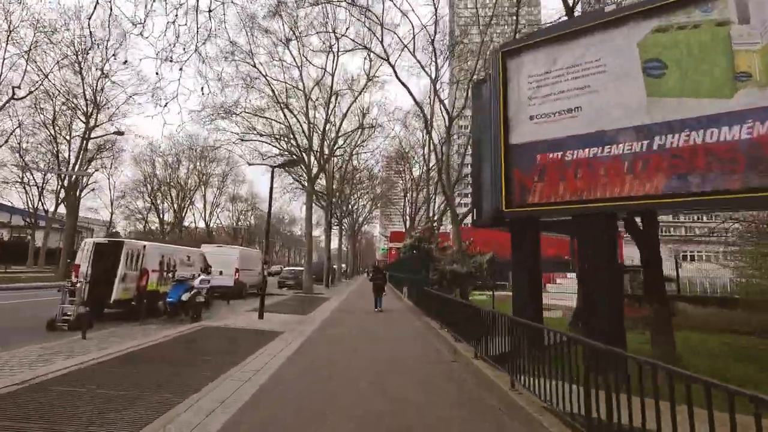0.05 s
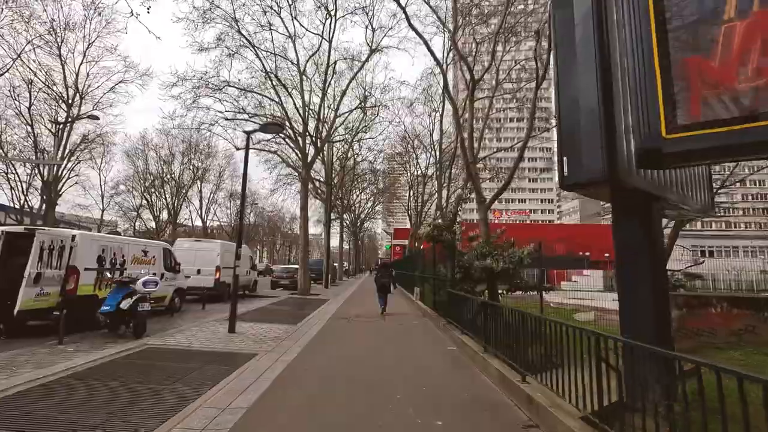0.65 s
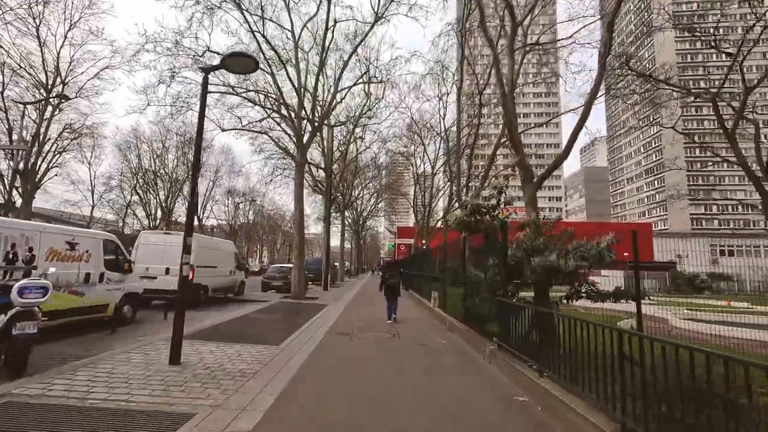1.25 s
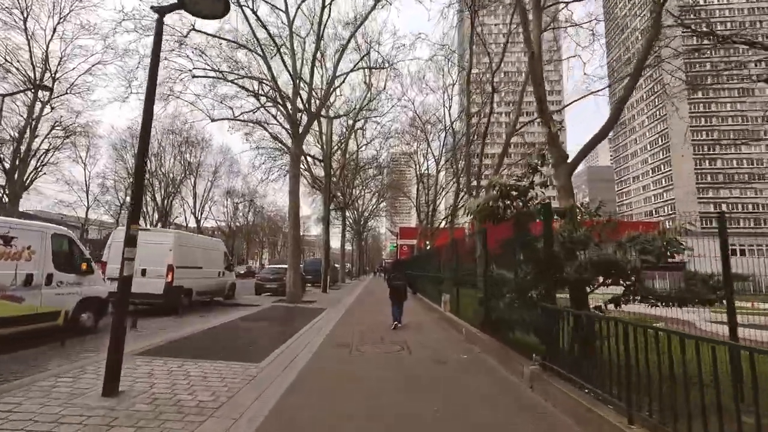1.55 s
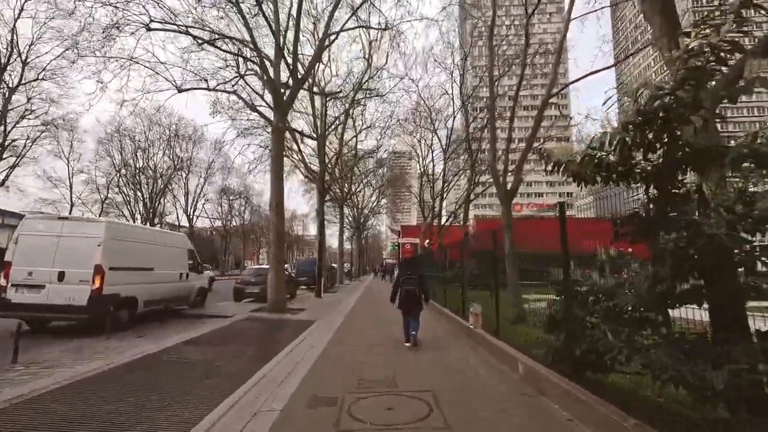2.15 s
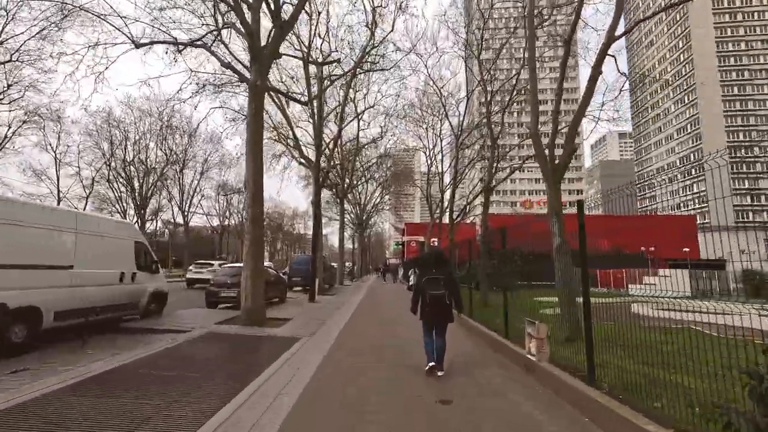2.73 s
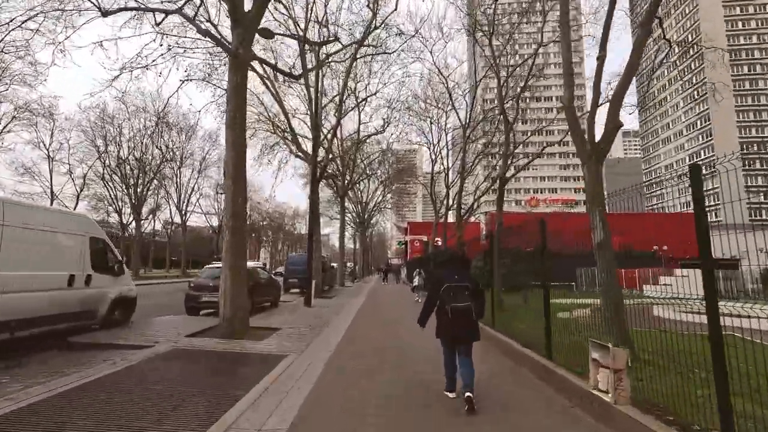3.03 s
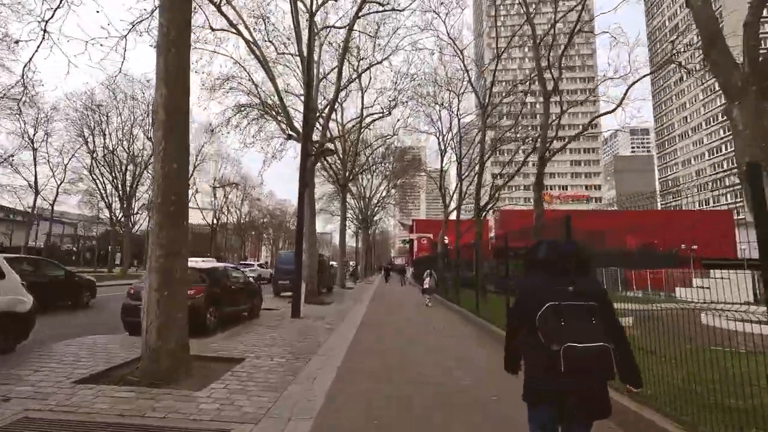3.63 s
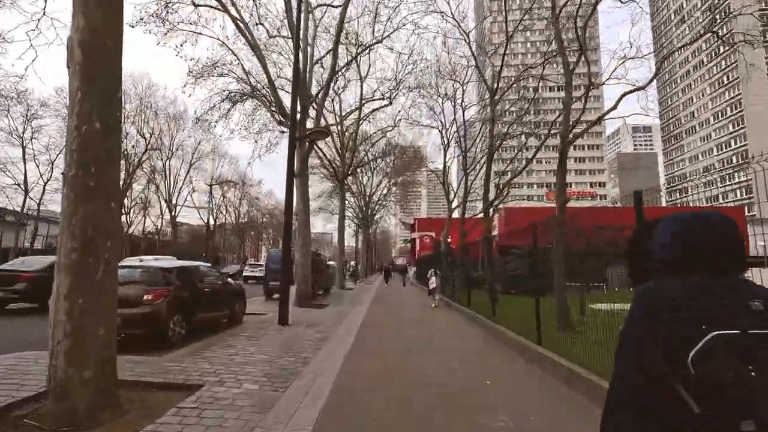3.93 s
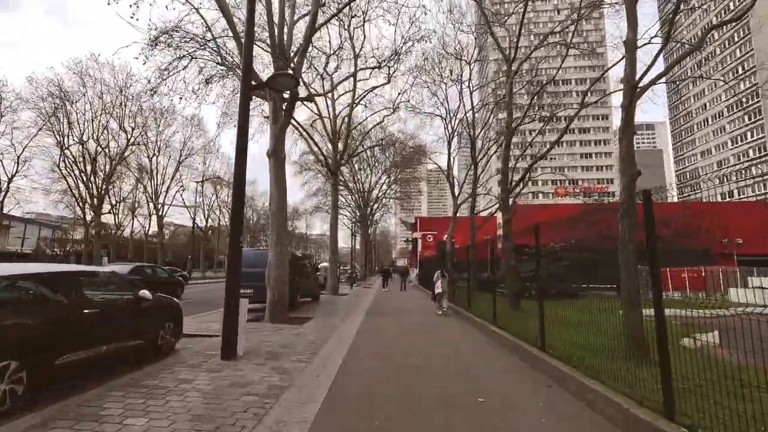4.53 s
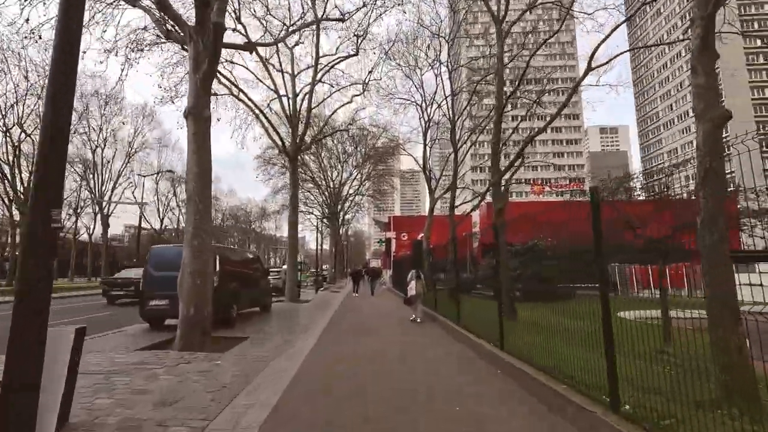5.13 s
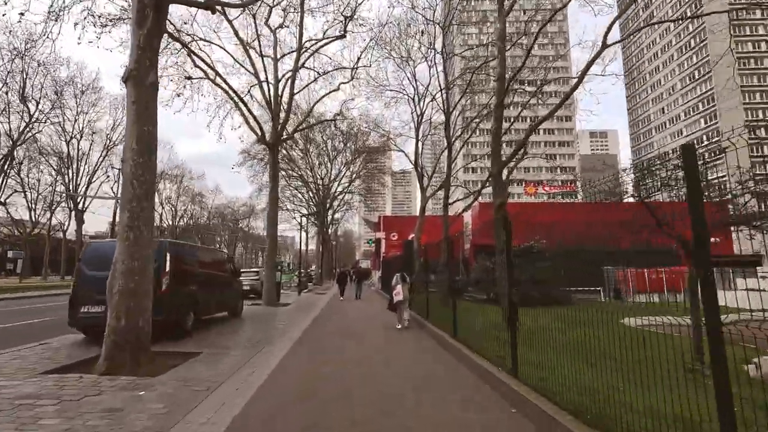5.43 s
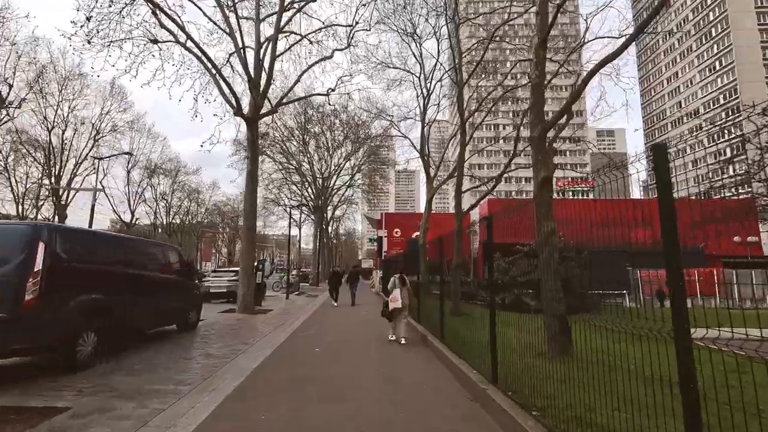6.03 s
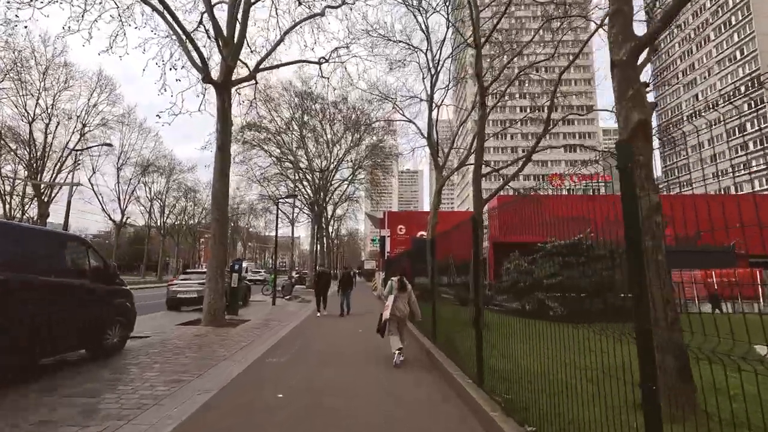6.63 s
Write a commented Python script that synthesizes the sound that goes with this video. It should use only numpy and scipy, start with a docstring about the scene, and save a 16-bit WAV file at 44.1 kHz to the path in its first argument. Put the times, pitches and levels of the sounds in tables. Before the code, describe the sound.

Skate wheels rumble and crackle over gritty asphalt, with wind buffeting the microphone and cars swishing past on a busy street.

```python
"""Inline skates rolling on an asphalt pavement beside a busy street, from a microphone on the skater.
Close up, the stony surface drums the wheels into a rumble; they crackle over sand, scuff on grit and
tick on a stone, while the air of the ride buffets the muffled mono microphone. Off to the side, car
tyres swish past in waves and an engine drones in swells. A thin fuzzy whistle hangs over the traffic
and fades; distant traffic lies behind it all."""
import sys
import numpy as np
from scipy import signal
from scipy.fft import rfft, irfft
from scipy.io import wavfile
from scipy.ndimage import uniform_filter1d

SR = 44100
rng = np.random.default_rng(int(sys.argv[2]) if len(sys.argv) > 2 else 0)


def store_wav(level_fs):
    """Save 16-bit WAV to argv[1]."""
    pcm = np.round(np.clip(np.atleast_2d(level_fs), -1, 1) * 32767)
    wavfile.write(sys.argv[1], SR, pcm.T.astype(np.int16))


N = 303408
T = np.arange(N) / SR

# how hard the wheels bear on the asphalt: t/s, relative level/dB
WHEEL_LOAD = [(0, -30.5), (1.35, -33), (1.85, -30.5), (2.35, -33.5), (2.9, -37.5), (3.25, -30.5),
              (3.55, -33.5), (3.85, -30.5), (4.1, -36), (5.5, -33.5), (6.5, -36.5), (6.88, -34.5)]
# spectra of wheel rumble, crushed sand and dust: f/Hz, relative level/dB
WHEEL_SPECTRUM = [(60, -22), (130, -6), (200, 0.5), (270, -4), (350, -4), (450, -8), (650, -25.5),
                  (1000, -12.5), (2000, -24), (5000, -81.5)]
SAND_SPECTRUM = [(1500, -4), (3000, 7), (3900, 7), (4900, -0.5), (5500, -6), (6200, -20.5), (7000, -23.5),
                 (8000, -39.5), (11500, -37.5), (12800, -49), (16000, -78)]
DUST_SPECTRUM = [(5000, -20), (8000, -5.5), (10000, 1), (11000, 5.5), (12000, -5.5), (13000, -16.5),
                 (16000, -57)]
# wheels droning on rough spots, scuffing, faintly squeaking: t/s, half-length/s, level/dB, f/Hz, width/Hz
ROUGH_SPOTS = [(.21, 0.11, -30, 234, 140), (.45, 0.1, -32.5, 377, 240), (1.65, 0.89, -36, 440, 260),
               (2.11, 0.046, -29, 340, 240), (3.14, 0.078, -31.5, 736, 320), (3.23, 0.076, -32.5, 310, 140),
               (4.88, .09, -30, 350, 150)]
WHEEL_SCUFFS = [(.062, .03, -54, 4800, 1600), (.108, .025, -44, 3600, 2190), (.2, .11, -55, 4570, 3200),
                (.49, 0.14, -33, 1300, 800), (1.555, .036, -52, 4470, 2200), (2.76, 0.093, -36, 1640, 900),
                (3.16, .1, -50, 4570, 1700), (4.53, 0.13, -43, 2600, 900), (4.715, 0.035, -58, 6000, 1410),
                (5.08, 0.16, -52, 5000, 1700), (5.57, .1, -42, 2900, 900)]
WHEEL_SQUEAKS = [(1.997, .022, -74, 7350, 350), (3.74, .026, -76, 12000, 260),
                 (4.415, .03, -82, 11700, 800)]
# loose sand underfoot: t/s, half-length/s, sand level/dB, dust level/dB
SANDY_SPOTS = [(0.197, 0.03, -43, -79), (0.418, 0.1, -50, -96), (1.203, 0.27, -53.5, -83),
               (1.855, .15, -55, -81.5), (2.78, 0.095, -55.5, -84), (3.204, 0.14, -50, -88),
               (4.053, 0.16, -48, -100), (4.68, .17, -48, -100), (5.166, 0.22, -48.5, -100),
               (5.8, 0.75, -53.5, -104), (6.848, .05, -47, -90)]
# a wheel clips a stone: t/s, crunch level/dB, ring level/dB
STONE_HITS = [(.104, -42, -46), (.1105, -36.5, -44), (3.1685, -42, -34), (4.7144, -47, -48),
              (5.0694, -46, -44)]
# modes of the skate's frame: f/Hz, relative level/dB, t60/s
SKATE_MODES = [(3774, -7, .031), (4200, 4, .026), (4570, -4, .024), (5000, -8, .036), (5250, -10, .029)]
# airflow over the microphone: t/s, relative level/dB
MIC_AIRFLOW = [(0, -31.5), (1.0, -27), (2.0, -31), (2.5, -35), (3.1, -26), (3.55, -30), (4.0, -26.5),
               (5.1, -26.5), (5.7, -25), (6.05, -32), (6.55, -32), (6.88, -26)]
# gusts on top of it: t/s, half-length/s, buffet level/dB, flutter level/dB
MIC_GUSTS = [(0.083, 0.073, -21.5, -27.5), (0.594, 0.18, -24, -41), (1.194, 0.064, -24, -28),
             (1.922, 0.062, -24, -40), (2.347, 0.082, -23.5, -46), (2.844, 0.15, -25, -44),
             (3.292, 0.07, -22, -39), (3.75, 0.057, -22, -40), (4.002, 0.094, -22, -32),
             (4.207, 0.057, -22.5, -33), (4.69, 0.15, -23.5, -31.5), (5.918, 0.038, -22, -42)]
# spectra of large and small eddies: f/Hz, relative level/dB
BUFFET_SPECTRUM = [(0, -38.5), (5, -8), (18, -1), (35, 1.5), (52, -2.5), (70, -5), (110, -19.5), (200, -32),
                   (1200, -93.5)]
FLUTTER_SPECTRUM = [(40, -8), (75, 3.5), (100, 3.5), (150, -2.5), (200, -8), (300, -14), (1200, -82.5)]
# cars going by: nearest t/s, time to cover their own distance/s, roar/dB, hiss/dB, ring/dB, tread f/Hz
CAR_PASSES = [(.3, 0.32, -46.5, -38.5, -35.5, 1010), (.8, 0.4, -42, -37, -39, 1057),
              (1.35, .22, -34, -46, -36.5, 1073), (1.72, 0.34, -33.5, -47, -38, 1012),
              (2.61, 0.074, -31.5, -43.5, -36.5, 880), (2.76, .1, -33.5, -36, -46, 1075),
              (3.13, 0.18, -31, -36, -34, 1106), (3.87, 0.52, -33.5, -38, -48.5, 1000),
              (4.49, 0.13, -36, -33.5, -42, 1125), (4.75, 0.078, -34, -39.5, -33, 943),
              (5.05, 0.16, -32.5, -35.5, -45, 1010), (5.22, 0.13, -33.5, -39.5, -37, 992),
              (5.48, 0.16, -35.5, -37.5, -43, 1080), (5.85, 0.37, -42.5, -45, -44, 1105),
              (6.95, 0.11, -32, -40, -41, 1023)]
# spectra of tyre roar and tyre hiss: f/Hz, relative level/dB
ROAR_SPECTRUM = [(150, -19.5), (400, -9), (560, 0), (750, 1.5), (1000, 0), (1250, -1), (1500, -7),
                 (2000, -15), (3200, -26), (7000, -71)]
HISS_SPECTRUM = [(600, -8.5), (1200, 0), (1700, 2), (2200, -0.5), (2800, -4), (3300, -8.5), (4000, -16),
                 (5000, -21), (8000, -80)]
# a tread briefly sings out of the roar: t/s, half-length/s, level/dB, f/Hz, width/Hz
TYRE_NOTES = [(.3, .25, -37, 995, 110), (1.77, 0.094, -35, 1170, 70), (2.61, .08, -38, 850, 120),
              (3.02, .12, -38, 1080, 110), (3.15, 0.13, -33, 1206, 130), (3.42, .2, -37, 1130, 200),
              (4.59, .11, -33, 1065, 80), (4.76, .1, -30, 955, 110), (4.845, 0.057, -29.5, 1040, 110),
              (4.97, 0.084, -40, 1200, 110), (5.14, .22, -43, 1715, 55), (5.18, 0.092, -32, 1010, 130),
              (5.35, .12, -35, 945, 80)]
# a nearby engine comes through: t/s, half-length/s, level/dB
EXHAUST_SWELLS = [(1.6, 0.25, -24.5), (2.187, 0.18, -24.5), (3.002, 0.052, -23), (5.503, 0.21, -34),
                  (6.62, 0.18, -33)]
# the whistle's close modes: f/Hz, width/Hz, relative level/dB, fade/(dB/s)
WHISTLE_RESONANCES = [(2945, 60, -11.5, 1.4), (2992, 34, -7.5, .5), (3335, 52, -4.5, 1.5),
                      (3388, 48, -.3, 1.2), (3428, 38, -7.5, .7)]
# one mode or another flares up: t/s, half-length/s, level/dB, f/Hz, width/Hz
MODE_FLARES = [(.82, 0.15, -45, 3370, 50), (1.02, .25, -48, 2960, 70), (1.07, 0.23, -48, 3410, 45),
               (1.36, 0.24, -46.5, 3308, 50), (1.82, .2, -52, 3390, 40), (1.97, .25, -52.5, 2950, 70),
               (2.13, .2, -52, 3310, 50), (2.87, 0.27, -51, 3410, 50), (3.25, 0.35, -52, 3370, 55),
               (3.72, 0.37, -57, 3012, 35)]
# spectrum of distant traffic: f/Hz, relative level/dB
STREET_SPECTRUM = [(20, -8.5), (60, 3), (200, -1.5), (450, -3), (1000, -6), (1600, -13), (2600, -15.5),
                   (3500, -25.5), (4900, -27.5), (6000, -35), (8000, -61.5), (14000, -75)]


def wheels():
    """Right below the microphone, the asphalt's stones drum on wheels that throb faintly as they turn."""
    load_db, = follow(WHEEL_LOAD)
    turns_per_s = 20 * (1 + 0.033 * wander(1.6))
    turns = np.cumsum(turns_per_s) / SR
    throb = 1 + 0.067 * np.cos(2 * np.pi * 2 * turns)  # twice a turn
    drumming = stones(per_s=6000, spread_db=1) * throb
    rumble = steadied(colour(drumming, WHEEL_SPECTRUM), seconds=0.44)
    return gain_of(load_db - 1) * rumble + bursts(ROUGH_SPOTS)


def grit():
    """Sand crushed under the wheels crackles, dust sizzles above it; pinched grains, perhaps, squeak."""
    s, half, sand_db, dust_db = np.transpose(SANDY_SPOTS)
    crackle = colour(stones(per_s=3500, spread_db=2), SAND_SPECTRUM)
    sand = swells(s, half, sand_db, base_db=-47.5 - 1.55 * T) * crackle
    dust = swells(s, half, dust_db, base_db=-88.5 - 0.5 * T) * colour(noise(), DUST_SPECTRUM)
    return gain_of(.5 * wander(40)) * sand + gain_of(2.5 * wander(18)) * dust + bursts(WHEEL_SQUEAKS)


def scuffs():
    """A wheel scrapes briefly on grit."""
    return bursts(WHEEL_SCUFFS)


def ticks():
    """A stone crunches under a wheel and the skate's frame rings for a moment."""
    half_s, crunch_hz, width_hz = .004, 3500, 3000
    out = bursts([(s, half_s, db, crunch_hz, width_hz) for s, db, _ in STONE_HITS])
    t = np.arange(SR // 10) / SR
    attack = np.minimum(2 * t / half_s, 1)
    for s, _, ring_db in STONE_HITS:
        ring = sum(gain_of(db - 60 * t / t60) * np.sin(2 * np.pi * (hz * t + rng.random()))
                   for hz, db, t60 in SKATE_MODES)
        start = round((s - half_s / 2) * SR)
        out[start:start + len(t)] += gain_of(ring_db) * attack * ring
    return out


def wind():
    """The skater's speed keeps large and small eddies beating on the microphone; gusts add to both."""
    air_db, = follow(MIC_AIRFLOW)
    s, half, buffet_db, flutter_db = np.transpose(MIC_GUSTS)
    large_eddies = steadied(colour(noise(), BUFFET_SPECTRUM), seconds=0.14)
    small_eddies = steadied(colour(noise(), FLUTTER_SPECTRUM), seconds=0.18)
    buffet = swells(s, half, buffet_db, base_db=-19.5 + 0.28 * air_db) * large_eddies
    flutter = swells(s, half, flutter_db, base_db=air_db - 1) * small_eddies
    return sum(eddies * gain_of(wander(11)) for eddies in (buffet, flutter))  # about 1 dB of turbulence


def cars():
    """Out on the road, tyres roar, hiss and ring; each car swells as it nears and drops in pitch."""
    falloff, doppler_share, far_tread_hz = 1.185, 0.034, 1070
    roar_power, hiss_power, ring_power = gain_of([-39.5, -42, -51.5]) ** 2  # cars farther off
    weighted_hz = ring_power * far_tread_hz
    for s, pass_s, roar_db, hiss_db, ring_db, tread_hz in CAR_PASSES:
        along = (T - s) / pass_s
        distance = np.sqrt(1 + along ** 2)  # 1 at the nearest point
        nearness = distance ** (-2 * falloff)
        roar_power += nearness * gain_of(roar_db) ** 2
        hiss_power += nearness * gain_of(hiss_db) ** 2
        own_ring = nearness * gain_of(ring_db) ** 2
        ring_power += own_ring
        weighted_hz += own_ring * tread_hz * (1 - doppler_share * along / distance)
    pitch_hz = weighted_hz / ring_power  # the loudest car leads the pitch
    tread = steadied(resonate(noise(), pitch_hz, width_hz=302), seconds=0.25)
    tread += gain_of(-10.5) * resonate(noise(), 1.335 * pitch_hz, width_hz=430)
    roar = np.sqrt(roar_power) * colour(noise(), ROAR_SPECTRUM)
    hiss = np.sqrt(hiss_power) * colour(noise(), HISS_SPECTRUM)
    return np.sqrt(ring_power) * tread + roar + hiss + bursts(TYRE_NOTES)


def engine():
    """A nearby exhaust: a low, slightly uneven note with a weak overtone, slowly sagging."""
    hz = (55.2 - .9 * T) * (1 + 0.048 * wander(6.9))
    phase = 2 * np.pi * np.cumsum(hz) / SR
    level = swells(*np.transpose(EXHAUST_SWELLS), base_db=-38.5) * gain_of(0.95 * wander(6.3))
    return level * unit_rms(np.sin(phase) + gain_of(-17.5) * np.sin(2 * phase))


def whistle():
    """Over the traffic, close modes beat and flare, perhaps a dragging brake; a faint whine takes over."""
    start_s, attack_s, end_s, release_s = .57, .06, 6.1, 1
    age = T - start_s
    gate = np.clip(age / attack_s, 0, 1) * np.clip((end_s - T) / release_s, 0, 1)
    bend = 1 + 0.0012 * (T - 1.7) ** 2  # the pitch sags until 1.7 s, then rises
    ring = 0
    for hz, width_hz, db, fade in WHISTLE_RESONANCES:
        drifting_hz = hz * (bend + 0.0023 * wander(2.2))
        mode = steadied(resonate(noise(), drifting_hz, width_hz), seconds=0.066)
        ring += gain_of(db - fade * age + 0.4 * wander(3.5)) * mode
    whine_level = gain_of(-64) * np.exp(-((T - 6) / .55) ** 2 / 2)
    whine = whine_level * resonate(noise(), hz=4840, width_hz=72)
    return gain_of(-49) * gate * ring + bursts(MODE_FLARES) + whine


def street():
    """The even wash of traffic in the far distance."""
    return gain_of(-34.5) * colour(noise(), STREET_SPECTRUM)


def gain_of(db):
    """Decibels to amplitude."""
    return 10 ** (np.asarray(db) / 20)


def unit_rms(x):
    """Scales to an rms of one."""
    return x / np.sqrt(np.mean(x ** 2) + 1e-20)


def follow(rows):
    """One curve over the whole time for each column after the first."""
    s, *columns = np.transpose(rows)
    return [np.interp(T, s, column) for column in columns]


def colour(x, spectrum):
    """Gives x a spectrum drawn on a log-frequency axis, at unit rms."""
    hz, db = np.transpose(spectrum)
    bins = np.fft.rfftfreq(N, 1 / SR)
    curve_db = np.interp(np.log(bins + 1), np.log(hz + 1), db)
    return unit_rms(irfft(rfft(x) * gain_of(curve_db), N))


def noise():
    """White noise."""
    return rng.standard_normal(N)


def wander(rate_hz):
    """A smooth random curve of unit rms, moving at up to about the given rate."""
    bins = np.fft.rfftfreq(N, 1 / SR)
    slow = np.exp(-(bins / rate_hz) ** 2) * (bins > 0)
    return unit_rms(irfft(rfft(noise()) * slow, N))


def steadied(x, seconds):
    """Evens out swells slower than the given time."""
    power = uniform_filter1d(x ** 2, int(seconds * SR))
    return x / np.sqrt(uniform_filter1d(power, SR // 40) + 1e-9)


def resonate(x, hz, width_hz):
    """A steep resonance that can follow a moving centre, at unit rms."""
    carrier = np.exp(2j * np.pi * np.cumsum(hz * np.ones(len(x))) / SR)
    r = np.exp(-np.pi * width_hz / SR)
    envelope = signal.lfilter([(1 - r) ** 2], [1, -2 * r, r * r], x / carrier)
    return unit_rms((carrier * envelope).real)


def stones(per_s, spread_db):
    """Tiny impacts of uneven size at random moments."""
    size = gain_of(spread_db * np.minimum(rng.exponential(1, N), 4))
    return unit_rms(size * np.sign(noise()) * (rng.random(N) < per_s / SR))


def bursts(rows):
    """Short noises, each swelling and fading in one resonance."""
    out = np.zeros(N)
    for s, half, db, hz, width_hz in rows:
        at = np.flatnonzero(abs(T - s) < half)
        swell = np.cos(np.pi / 2 * (T[at] - s) / half) ** 4
        out[at] += gain_of(db) * swell * resonate(noise()[at], hz, width_hz)
    return out


def swells(times, half_lengths, levels_db, base_db):
    """Amplitude of a base level with bell-shaped swells on top; their powers add."""
    bells = sum(gain_of(db) ** 2 * np.exp(-((T - s) / half) ** 2)
                for s, half, db in zip(times, half_lengths, levels_db))
    return np.sqrt(gain_of(base_db) ** 2 + bells)


def scene():
    """At the skater's microphone: air right on it, skates just below, traffic off to the side."""
    air = wind()
    dull = signal.cheby1(8, .5, 5700, fs=SR, output="sos")  # scuffs and ticks are dull above 5700 Hz
    skates = wheels() + grit() + signal.sosfilt(dull, scuffs() + ticks())
    traffic = cars() + engine() + whistle() + street()
    return (skates + air + traffic)[None]


def record(dry):
    """The recorder's band limit, with soft ends."""
    top_hz, fade_s = 12900, .003
    ends = np.minimum(np.minimum(T, T[::-1]) / fade_s, 1)
    lowpass = signal.firwin(511, top_hz, window=("kaiser", 9), fs=SR)
    return signal.oaconvolve(dry * ends, lowpass[None], "same")


dry = scene()
out = record(dry)
store_wav(out)
```